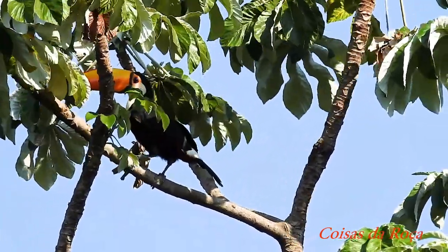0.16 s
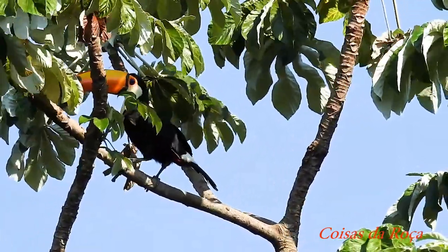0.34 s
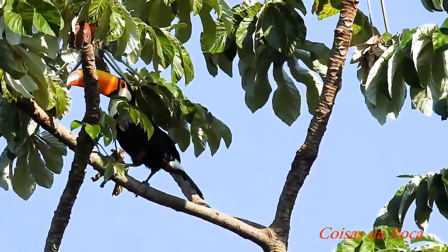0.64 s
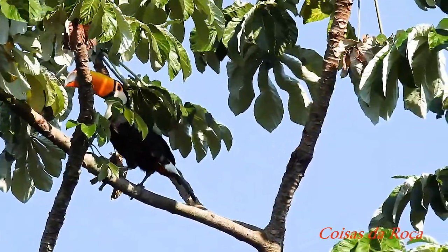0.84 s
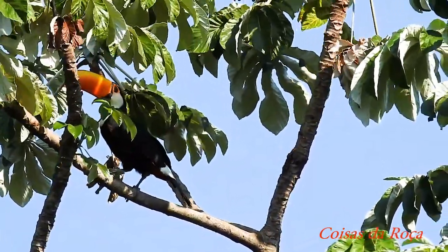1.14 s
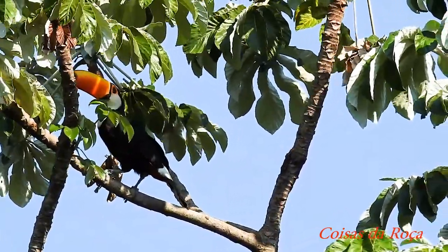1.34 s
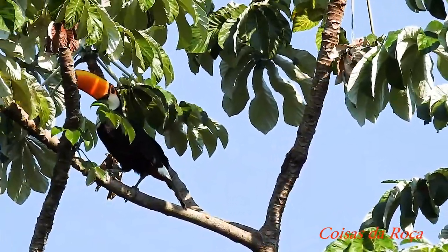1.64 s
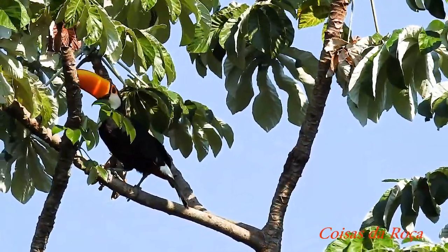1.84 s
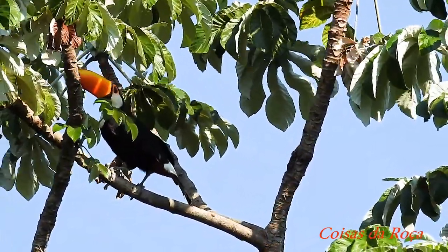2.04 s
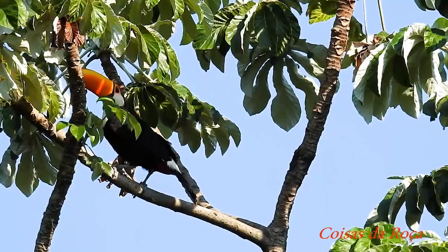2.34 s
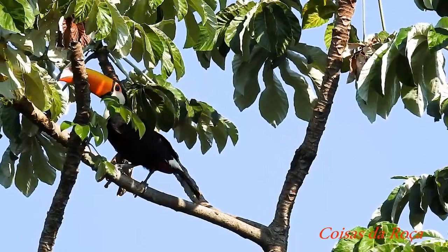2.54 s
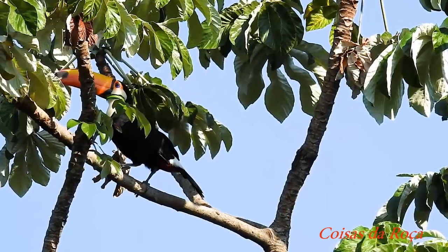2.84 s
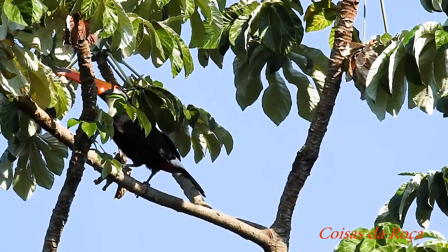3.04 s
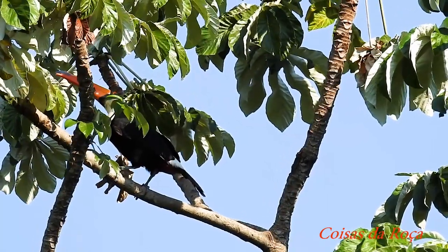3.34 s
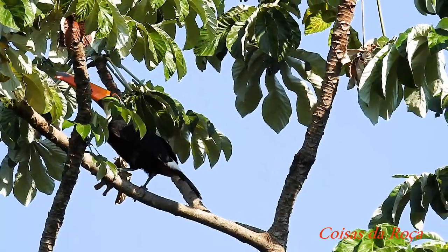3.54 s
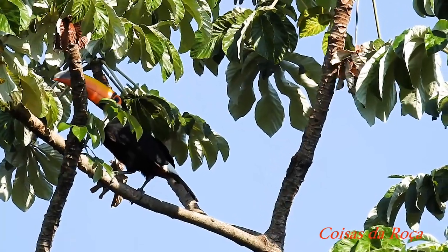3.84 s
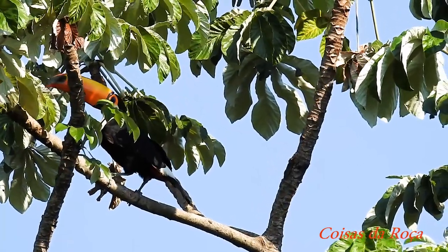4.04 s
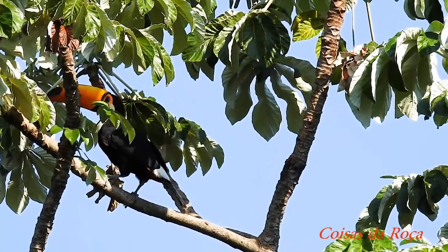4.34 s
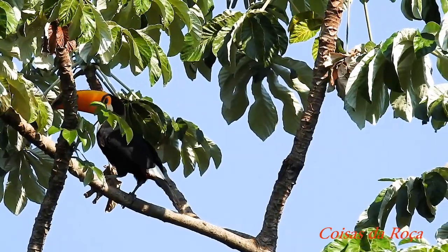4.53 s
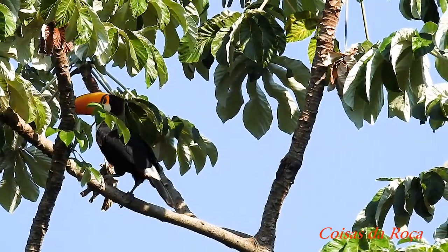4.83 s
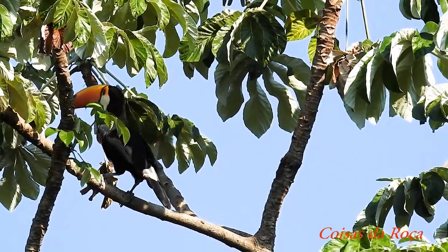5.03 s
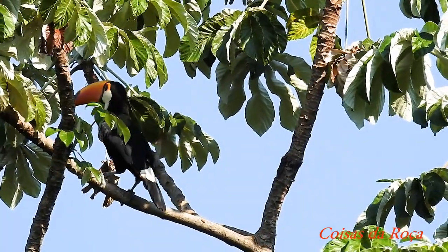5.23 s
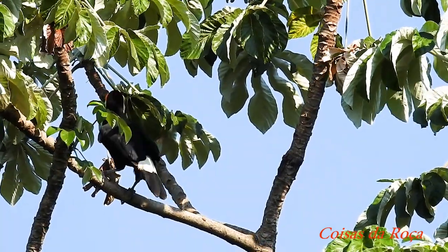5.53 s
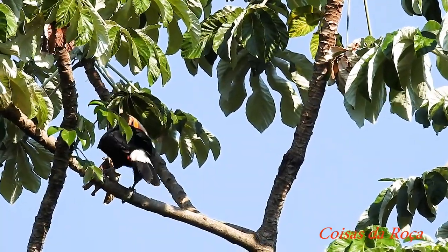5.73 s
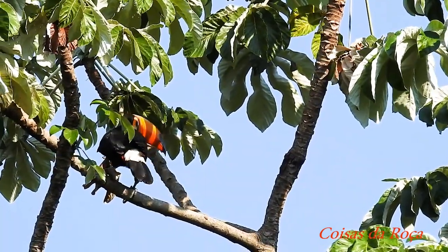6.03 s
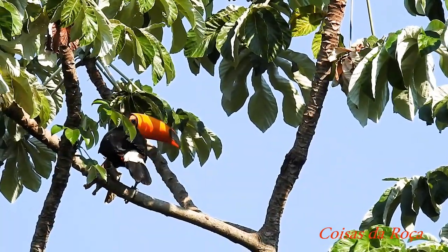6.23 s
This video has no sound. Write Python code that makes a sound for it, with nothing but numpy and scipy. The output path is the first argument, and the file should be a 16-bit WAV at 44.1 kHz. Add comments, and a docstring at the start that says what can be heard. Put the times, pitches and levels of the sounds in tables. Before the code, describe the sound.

Outdoors, a large bird rattles, squawks harshly and cries once in a rising, sinking note, while a cricket pulses and a distant bird whistles faintly.

```python
"""Among trees, a toucan gives four rattling croaks, two alike harsh squawks and one long arching cry.
Croaks are runs of swept throat pulses; squawks drive resonances with buzz and noise; the cry sums harmonics.
Gliding sines make a farther bird's whistles, noise puffs make grunts and faint rough echoes of the cry, and a
tone modulated by wing strokes makes a cricket. Coloured noise gives air, insect hiss and breeze on the microphone.
Convolution with decaying noise scatters the calls among the trees."""
import sys
import numpy as np
from scipy import signal
from scipy.fft import rfft, irfft, next_fast_len
from scipy.io import wavfile
from scipy.ndimage import map_coordinates

SR = 44100
rng = np.random.default_rng(int(sys.argv[2]) if len(sys.argv) > 2 else 0)


def wav_record(signal):
    """Record a signal, one row per channel, as 16-bit PCM in the file named by sys.argv[1]."""
    frames = np.transpose(np.atleast_2d(signal))
    bounded = np.clip(frames, -1, 1)
    # unit amplitude maps onto the largest positive 16-bit level
    quanta = np.round(bounded * 32767).astype(np.int16)
    wavfile.write(sys.argv[1], SR, quanta)


N = 281358


def amp(db):
    """Logarithmic level: decibels become an amplitude gain."""
    return 10 ** (np.asarray(db) / 20)


def unit(x):
    """Normalisation: x is scaled to rms 1."""
    return x / np.sqrt(np.mean(x ** 2) + 1e-20)


def along(points, hz):
    """Logarithmic frequency: values are interpolated between (frequency, value) points."""
    f, v = np.transpose(points)
    return np.interp(np.log(hz + 1), np.log(f + 1), v)


def clock():
    """Sampling: the time of every sample in seconds."""
    return np.arange(N) / SR


def curves(rows):
    """Linear interpolation: one curve for each column after the time."""
    s, *cols = np.transpose(rows)
    return [np.interp(clock(), s, c) for c in cols]


def gate(start, end, fade):
    """Gating: 1 between two times, with ramps of the fade's length."""
    return np.clip(np.minimum(clock() - start, end - clock()) / fade + .5, 0, 1)


def wobble(rate, size=N):
    """Band-limited fluctuation: a smooth random curve with rate knots a second."""
    return map_coordinates(rng.standard_normal(int(size * rate / SR) + 4), [np.arange(size) * rate / SR])


def swell(t, peak, rise, fall):
    """Gaussian envelope: a bell in time with unequal flanks."""
    return np.exp(-.5 * ((t - peak) / np.where(t < peak, rise, fall)) ** 2)


def cycles(hz):
    """Phase accumulation: the running sum of a frequency curve, in radians."""
    return 2 * np.pi * np.cumsum(hz) / SR


def filtered(x, response):
    """Linear filtering: the spectrum is multiplied by a response of frequency."""
    n = x.shape[-1]
    m = next_fast_len(n + 4096)  # room for the filter's ringing
    return irfft(rfft(x, m) * response(np.fft.rfftfreq(m, 1 / SR)), m)[..., :n]


def coloured(x, spectrum):
    """Spectral shaping: x takes a (frequency, level) colour and rms 1."""
    return unit(filtered(x, lambda hz: amp(along(spectrum, hz))))


def band(hz, centre, width):
    """Damped resonance: the response of one second-order resonator."""
    return 1j * hz * width / (centre ** 2 - hz ** 2 + 1j * hz * width)


def add(track, s, sound):
    """Superposition: a sound is mixed into the track at time s."""
    part = track[round(s * SR):][:len(sound)]
    part += sound[:len(part)]


# Likeness of the left and right noise. Columns: frequency_hz, correlation (-1 to 1).
STEREO_LIKENESS = [(100, 0.97), (1000, 0.28), (4000, 0.47), (6500, 0.43), (11000, 1)]


def rush(spectrum):
    """Interchannel correlation: stereo noise of rms 1 with a chosen colour."""
    def mid_and_side(hz):
        turn = np.arccos(np.clip(along(STEREO_LIKENESS, hz), -1, 1)) / 2
        return np.array([np.cos(turn), np.sin(turn)])

    mid, side = filtered(rng.standard_normal((2, N)), mid_and_side)
    return coloured(np.array([mid + side, mid - side]), spectrum)


# Colour of distant air. Columns: frequency_hz, relative_density_db.
AIR_COLOUR = [(25, 0.5), (80, -1.5), (200, 2.5), (400, 1), (470, 8), (560, -0.5), (750, 5.5), (950, 1),
              (2000, 0), (3800, -3.5), (8000, -16), (15000, -20.5)]
# Colour of the insect hiss. Columns: frequency_hz, relative_density_db.
HISS_COLOUR = [(3200, -59), (4200, -6.5), (4800, -1.5), (5500, -6), (6150, 2), (6800, -4), (7500, -11.5),
               (10000, -16)]
# Colour of breeze on the microphone. Columns: frequency_hz, relative_density_db.
BREEZE_COLOUR = [(12, -32.5), (20, -3), (70, 1), (152, -16), (231, -35.5), (300, -24.5), (390, -56),
                 (660, -120)]
# Puffs of breeze. Columns: peak_s, spread_s, level_db (before a random flutter).
BREEZE_PUFFS = [(3.2, .028, -51), (3.265, .058, -56.5), (3.58, .028, -60.5), (4.054, .015, -56),
                (4.8, .08, -61), (5.052, .015, -51), (5.184, .027, -46.5)]


def background():
    """Broadband noise: air, insects and low lumps of breeze, with a thin high tone."""
    air = amp(-58 + 0.25 * wobble(4.3)) * rush(AIR_COLOUR)
    hiss = amp(-56.5 + 0.62 * wobble(5) + .5 * wobble(15)) * rush(HISS_COLOUR)
    puffs = sum(amp(db) * swell(clock(), s, spread, spread) for s, spread, db in BREEZE_PUFFS)
    steady = amp(np.interp(clock(), [1.2, 1.9], [-82, -73]))  # the breeze picks up
    breeze = (puffs + steady) * amp(1.4 * wobble(22)) * rush(BREEZE_COLOUR)
    tone_hz = 15735
    tone = amp(-66.5) * (1 + .35 * wobble(30)) * np.sin(2 * np.pi * tone_hz * clock())
    return air + hiss + breeze + tone


# Bouts of the cricket. Columns: start_s, end_s, relative_level_db.
CRICKET_TRILLS = [(.181, .72, -54), (1.184, 1.74, -54.5), (2.186, 2.735, -53.5), (3.195, 3.76, -56),
                  (4.652, 4.88, -57.5), (5.322, 5.87, -53), (6.272, 6.45, -56)]
CRICKET_HZ, STROKE_HZ = 6055, 34.6  # mean pitch; wing strokes a second
STROKE_DEPTH = .88  # depth of the wing strokes, 0-1
BUZZ_START_S, BUZZ_END_S, BUZZ_HZ, BUZZ_DB = 4.87, 5.32, 6170, -58  # fills one pause


def cricket():
    """Amplitude modulation: each wing stroke is a short rising tone; a smoother buzz fills one pause."""
    out = np.zeros(N)
    scrape = wobble(500)
    for start, end, db in CRICKET_TRILLS:
        stroke = (clock() - start) * STROKE_HZ % 1
        size = 1 - STROKE_DEPTH * np.cos(np.pi * stroke) ** 2
        pitch = CRICKET_HZ + 200 * (stroke - .5) + 55 * scrape
        out += amp(db + 4.5) * gate(start, end, .02) * size * np.sin(cycles(pitch))
    buzz = np.sin(cycles(BUZZ_HZ + 130 * scrape))
    return out + amp(BUZZ_DB) * gate(BUZZ_START_S, BUZZ_END_S, .02) * buzz


# Faint whistles. Columns: start_s, length_s, first_pitch_hz, last_pitch_hz, relative_level_db (at the end).
FAR_WHISTLES = [(.55, .06, 2600, 2500, -62), (4.75, .095, 2470, 1990, -47), (5.17, .17, 2290, 2590, -52),
                (5.39, .04, 2820, 2930, -49)]
WHISTLE_SWELL_DB, WHISTLE_QUAVER = 10, .028  # growth toward the end; quaver as a share of the pitch


def whistles():
    """Frequency glide: a farther bird's thin, quavering tones slide, with a weak fourth harmonic."""
    out = np.zeros(N)
    for s, length, first_hz, last_hz, db in FAR_WHISTLES:
        progress = np.clip((clock() - s) / length, 0, 1)
        glide_hz = first_hz + (last_hz - first_hz) * progress
        phase = cycles(glide_hz * (1 + WHISTLE_QUAVER * wobble(900)))
        size = amp(db - WHISTLE_SWELL_DB * (1 - progress)) * gate(s, s + length, .02)
        out += size * (np.sin(phase) + amp(-20) * np.sin(4 * phase))
    return out


# Croaks, each a slowing run of throat pulses. Columns: start_s, pulse_count, first_gap_s,
# gap_growth_s (per pulse), crest_s (after the start), first_level_db, crest_level_db,
# edge_level_db (at the crest), ring_hz (at the crest), late_lift_hz. Levels are relative.
CROAK_RUNS = [(1.235, 8, .01677, .00124, .108, -39, -29.5, -36.8, 1630, 0),
              (2.7652, 9, .01542, .00125, .126, -42.5, -27.5, -34, 1655, 0),
              (4.853, 9, .01463, .00144, .058, -43.5, -26.6, -35.5, 1680, 220),
              (5.625, 8, .01623, .00143, .116, -41.5, -29, -39.5, 1625, 0)]
CROAK_SWELL_POWER = 1.6  # the rise flattens toward the crest
CROAK_SAG_DB_PER_S, CROAK_LAST_DB = 100, -9.5  # fading after the crest; the last pulse is much weaker
CROAK_HZ_PER_DB, CROAK_EDGE_SHARE = 10.5, .68  # ring pitch and edge level follow a pulse's strength
CROAK_LIFT_S, CROAK_LIFT_WIDTH_S = .108, .02  # centre and spread of the late lift of the ring


def croak_pulses():
    """Pulse train: time, ring pitch, ring level and edge level as each croak slows, swells and gives out."""
    for s, count, gap, growth, crest, first_db, crest_db, edge_db, hz, lift_hz in CROAK_RUNS:
        k = np.arange(round(count))
        t = gap * k + growth * k * (k - 1) / 2
        effort = (first_db - crest_db) * np.maximum(1 - t / crest, 0) ** CROAK_SWELL_POWER
        effort = effort - CROAK_SAG_DB_PER_S * np.maximum(t - crest, 0)
        effort = effort + CROAK_LAST_DB * (k == k[-1])
        lift = lift_hz * swell(t, CROAK_LIFT_S, CROAK_LIFT_WIDTH_S, CROAK_LIFT_WIDTH_S)
        ring_hz = hz + CROAK_HZ_PER_DB * effort + lift
        yield from zip(s + t, ring_hz, crest_db + effort, edge_db + CROAK_EDGE_SHARE * effort)


# Colour of the crackle at a croak pulse's edge. Columns: frequency_hz, relative_density_db.
EDGE_COLOUR = [(150, -14.5), (400, -10), (650, -1.5), (870, -23.5), (1300, -5.5), (1900, -3), (2300, -8),
               (2900, 5), (3300, -0.5), (4000, -3), (5200, -13.5), (7500, -23.5), (11000, -25.5),
               (15000, -43.5)]
AFTERCLICK_S, AFTERCLICK_DB = .009, -11  # a weaker click trails each pulse; level relative to the edge


def croaks():
    """Swept resonance: each pulse falls into the throat's resonance; strong ones ring, weak ones crackle."""
    out, t = np.zeros(N), np.arange(SR // 25) / SR - 1 / 50
    burst = swell(t, -.002, .0024, .0055)
    afterclick = amp(AFTERCLICK_DB) * swell(t, AFTERCLICK_S, .001, .002)
    for s, hz, ring_db, edge_db in croak_pulses():
        hz = hz * (1 + .012 * rng.standard_normal())
        clean = np.clip((ring_db + 44.5) / 16, .15, .97)
        grain = np.sqrt(clean) + np.sqrt(1 - clean) * wobble(900, size=len(t))
        ring = grain * np.sin(cycles(hz * np.exp(-10 * t))) * swell(t, -.0004, .003, .0036)
        sweep_hz = hz * np.exp(-np.clip(t + 0.00046, -.009, .012) / 0.0074)
        sweep = np.sin(cycles(sweep_hz)) * swell(t, -.003, .0025, .004)
        sweep = sweep / (1 + (sweep_hz / 4200) ** 12)  # mutes the sweep's highest part
        overtone = wobble(476, size=len(t)) * np.sin(cycles(np.full(len(t), 2920)))
        crackle = coloured(rng.standard_normal(len(t)), EDGE_COLOUR)
        edge = clean * sweep + burst * (amp(-1) * crackle + amp(-2.5) * overtone) + afterclick * crackle
        add(out, s - 1 / 50, amp(ring_db + 6.0) * ring + amp(edge_db) * edge)
    return out


# Soft grunts before the squawks, and faint rough echoes of the cry.
# Columns: peak_s, spread_s, chest_level_db, throat_level_db, hiss_level_db (before the trees' scatter).
GRUNT_PUFFS = [(1.787, .012, -53.5, -52, -52), (4.24, 0.015, -79, -48.5, -73),
               (4.339, 0.0186, -76, -50, -70), (4.393, 0.011, -85, -57.5, -80),
               (5.846, 0.017, -55, -54, -53.5)]


def grunts():
    """Filtered noise: short rough puffs in chest and throat resonances, with hiss."""
    chest_colour = [(300, -36), (490, -1.5), (700, -22), (1500, -52.5)]
    throat_colour = [(900, -20.5), (1400, -2), (1900, -12.5), (2600, 1.5), (3500, -19), (6000, -37.5)]
    hiss_colour = [(3500, -23.5), (6500, 1.5), (9000, -11), (13000, -24.5)]
    chest = coloured(rng.standard_normal(N), chest_colour)
    throat = coloured(rng.standard_normal(N), throat_colour)
    hiss = coloured(rng.standard_normal(N), hiss_colour)
    out = np.zeros(N)
    for s, spread, chest_db, throat_db, hiss_db in GRUNT_PUFFS:
        voice = amp(chest_db) * chest + amp(throat_db) * throat + amp(hiss_db) * hiss
        out += swell(clock(), s, spread, spread) * voice
    return out


# Squawks. Columns: start_s, relative_level_db.
SQUAWK_CALLS = [(1.836, 0), (5.893, 0)]
# Resonances, each with its own swell and passed twice. Columns: centre_hz,
# width_hz (of one pass), level_db, peak_s (after the start), rise_s, fall_s, roughness (0-1).
SQUAWK_RESONANCES = [(346, 44, -50, 0.13, .03, .03, 0.9), (495.4, 55, -35, 0.084, 0.035, 0.059, 0.47),
                     (724, 110, -44.5, .07, .025, .045, 1), (1012, 150, -42.5, 0.081, 0.028, 0.076, 0.6),
                     (1455, 470, -23, 0.02, 0.0017, 0.014, 0), (1307, 200, -35.5, .09, 0.044, 0.058, 0.68),
                     (1867, 180, -38, 0.13, 0.11, .06, 0.9), (2564, 270, -28.5, .052, .02, 0.033, .5),
                     (2750, 310, -27, .13, .06, 0.067, 0.96), (3583, 154, -22.5, 0.14, 0.052, 0.046, 0.74),
                     (2450, 450, -39, 0.0015, .0006, 0.0077, 0.4)]
# Colour of the squawk's rush. Columns: frequency_hz, relative_density_db.
SQUAWK_RUSH_COLOUR = [(200, -51), (340, -3), (750, 7.5), (870, -10.5), (1050, 5), (1500, -5), (1900, 11),
                      (2200, -16), (2500, -26), (3100, 12.5), (3600, 4.5), (4500, 1), (6000, -12.5),
                      (9500, -7), (11000, -18), (12500, -61)]
# Colour of the hiss that joins as the bill opens. Columns: frequency_hz, relative_density_db.
SQUAWK_HISS_COLOUR = [(2500, -32.5), (3300, 2), (4000, 2.5), (4800, -1), (6000, -7.5), (7200, -15.5),
                      (8000, -45.5), (10500, -22), (12500, -55)]
BEAT_FIRST_S, BEAT_GAP_S, BEAT_COUNT = .087, .0213, 5  # hard beats at the squawk's height, evenly spaced
BEAT_DB, BEAT_TAPER_DB = -13, 2.4  # the middle beat; loss per squared step away from it


def squawks():
    """Source and filter: throat buzz and rough noise drive resonances that peak at different times."""
    t = np.arange(SR // 2) / SR
    buzz_hz = 174 * (1 + .12 * np.clip(t / 0.0827, 0, 1) * wobble(120, size=len(t)))
    phase = cycles(buzz_hz) + 2 * np.pi / 5
    pulses = np.diff(np.floor(phase / (2 * np.pi)), prepend=0)  # one click a cycle
    tear = (1 + .5 * np.cos(phase)) * amp(2 * wobble(110, size=len(t)))
    turbulence = lambda: unit(rng.standard_normal(len(t)) * tear)
    call = np.zeros(len(t))
    for hz, width, db, peak, rise, fall, rough in SQUAWK_RESONANCES:
        source = np.sqrt(1 - rough) * unit(pulses) + np.sqrt(rough) * turbulence()
        voice = unit(filtered(source, lambda f: band(f, hz, width) ** 2))
        envelope = np.abs(signal.hilbert(voice))
        voice = unit(voice / np.sqrt(1 + 0.33 * envelope ** 2))  # the vibration saturates
        call += amp(db) * voice * swell(t, peak, rise, fall)
    opening = np.clip((t - .012) / 0.024, 0, 1)
    call += amp(-34.5) * coloured(turbulence(), SQUAWK_RUSH_COLOUR) * opening * swell(t, 0.072, 0.085, 0.081)
    call += amp(-30.5) * coloured(turbulence(), SQUAWK_HISS_COLOUR) * opening * swell(t, 0.17, 0.078, 0.045)
    beats = np.zeros(len(t))
    for k in range(BEAT_COUNT):
        beat_db = BEAT_DB - BEAT_TAPER_DB * (k - BEAT_COUNT // 2) ** 2
        beats += amp(beat_db) * swell(t, BEAT_FIRST_S + k * BEAT_GAP_S, .002, .002)
    call += beats * np.sin(cycles(3590 + 50 * wobble(93.3, size=len(t))))
    out = np.zeros(N)
    for s, db in SQUAWK_CALLS:
        add(out, s, amp(db) * call)
    return out


CRY_START_S, CRY_TOP_S, CRY_END_S = 3.47, 3.72, 4.17
CRY_START_HZ, CRY_TOP_HZ, CRY_END_HZ = 660, 1433, 850
CRY_RISE_POWER, CRY_FALL_POWER = 3.3, 2.15  # curvature of the two flanks


def cry_pitch():
    """Pitch contour: a power-law arch shoots up, rounds off at the top and sinks more slowly."""
    rising = np.clip((CRY_TOP_S - clock()) / (CRY_TOP_S - CRY_START_S), 0, 1) ** CRY_RISE_POWER
    falling = np.clip((clock() - CRY_TOP_S) / (CRY_END_S - CRY_TOP_S), 0, 1) ** CRY_FALL_POWER
    return CRY_TOP_HZ + (CRY_START_HZ - CRY_TOP_HZ) * rising + (CRY_END_HZ - CRY_TOP_HZ) * falling


# Course of the cry's fundamental. Columns: time_s, relative_level_db.
CRY_FIRST_HARMONIC = [(3.47, -58), (3.51, -46), (3.61, -40), (3.764, -58), (3.792, -37), (3.91, -39),
                      (3.962, -53), (4.074, -44), (4.17, -53)]
# Course of its strong third harmonic. Columns: time_s, relative_level_db.
CRY_THIRD_HARMONIC = [(3.47, -52), (3.526, -32), (3.636, -27), (3.642, -20), (3.678, -31), (3.686, -24),
                      (3.748, -38), (3.782, -20), (3.834, -28), (3.928, -23), (4.056, -33), (4.066, -25),
                      (4.17, -37)]
# The throat's weight on the higher overtones. Columns: frequency_hz, relative_level_db.
CRY_THROAT = [(2800, 33.5), (4200, 21), (5200, 12.5), (5800, 5.5), (7200, 4.5), (8600, 1), (9500, -11),
              (11500, -12), (12500, -36)]
# Colour of the hoarse rasp. Columns: frequency_hz, relative_density_db.
CRY_RASP_COLOUR = [(700, -35), (2000, -14), (2900, -11), (3600, -2), (4400, -14), (6500, -20), (9000, -33),
                   (12000, -38)]
CRY_SECOND_DB, CRY_OVERTONES_DB = -40, -60.5  # relative levels of the other harmonics at full effort
CRY_SLACK_HZ, CRY_SLACK_DB_PER_HZ = 1200, .042  # below this pitch they weaken
# the voice is pressed and brighter as it sinks
CRY_PRESS_S, CRY_PRESS_RISE_S, CRY_PRESS_FALL_S, CRY_PRESS_DB = 3.99, .035, .085, 6.5


def cry():
    """Additive harmonics: one arching nasal note, clean at the top, hoarse and weaker at low pitch."""
    pitch = cry_pitch()
    (first_db,), (third_db,) = curves(CRY_FIRST_HARMONIC), curves(CRY_THIRD_HARMONIC)
    slack_db = -CRY_SLACK_DB_PER_HZ * np.maximum(CRY_SLACK_HZ - pitch, 0)
    hoarse = np.clip((1360 - pitch) / 350, .03, 1)
    settling = 1 + 1.1 * swell(clock(), 3.49, .05, 0.074)  # the voice catches at first
    jitter = (0.0023 + 0.0247 * hoarse * settling) * wobble(800)
    phase = cycles(pitch * (1 + jitter))
    press_db = CRY_PRESS_DB * swell(clock(), CRY_PRESS_S, CRY_PRESS_RISE_S, CRY_PRESS_FALL_S)
    levels = [first_db - 3.5, CRY_SECOND_DB + slack_db, third_db - 3]
    for k in range(4, 10):
        levels.append(CRY_OVERTONES_DB + slack_db + press_db + along(CRY_THROAT, k * pitch))
    voice = sum(amp(db) * np.sin(k * phase) for k, db in enumerate(levels, 1))
    rasp = coloured(rng.standard_normal(N), CRY_RASP_COLOUR) * (1 + .5 * np.cos(phase))
    voice = np.sqrt(2) * voice + amp(third_db - 22) * hoarse * settling * rasp
    return voice * gate(CRY_START_S, CRY_END_S, 0.028)


# Decay of sound among the trees. Columns: frequency_hz, t60_s (time to fall by 60 dB).
TREE_DECAY = [(300, 0.21), (1500, 0.7), (3500, 0.54), (6000, 0.59), (12000, 0.1)]


def trees(x, near_db, far_db, echo_db):
    """Convolution: direct sound, quick branch scatter, a long tail and a blurred echo from the far trees."""
    hz, t, z = signal.stft(rng.standard_normal((2, SR)), SR, nperseg=256)
    decay = amp(-60 * t / along(TREE_DECAY, hz)[:, None])
    tail = signal.istft(z * decay, SR, nperseg=256)[1][:, :SR]
    t = np.arange(SR) / SR
    near = rng.standard_normal((2, SR)) * swell(t, 0.0091, 0.0028, 0.013)
    echo = rng.standard_normal((2, SR)) * swell(t, 0.1686, 0.0075, 0.011)
    parts = [(near_db, near), (far_db, tail), (echo_db, echo)]
    mid, side = sum(amp(db) * h / np.linalg.norm(h) for db, h in parts)
    side = filtered(side, lambda hz: hz / np.hypot(hz, 1100))  # long waves reach both microphones alike
    return x + signal.fftconvolve(x[None], np.array([mid + side, mid - side]), axes=1)[:, :N]


def scene():
    """Direct-to-scattered ratio: the croaks are close and dry, the whistles and cry deeper in the trees."""
    trill = trees(cricket(), near_db=-13, far_db=-16, echo_db=-35)
    distant = amp(0.5) * trees(whistles(), near_db=-3.5, far_db=-1.5, echo_db=-6)
    # paired gains in dB are left and right
    close = trees(croaks(), near_db=-12, far_db=-18, echo_db=-32) * amp([[-.5], [.5]])
    soft = trees(grunts(), near_db=-8.5, far_db=-3, echo_db=-15)
    harsh = trees(squawks(), near_db=-6, far_db=-12, echo_db=-22) * amp([[.35], [-.35]])
    long_cry = amp(1.0) * trees(cry(), near_db=0.5, far_db=-7.5, echo_db=-44) * amp([[.3], [-.3]])
    return background() + trill + distant + close + soft + harsh + long_cry


TOP_HZ = 15900


def record(dry):
    """Band limiting: nothing at or above the top frequency is kept."""
    return filtered(dry, lambda hz: hz < TOP_HZ)


dry = scene()
out = record(dry)
wav_record(out)
```